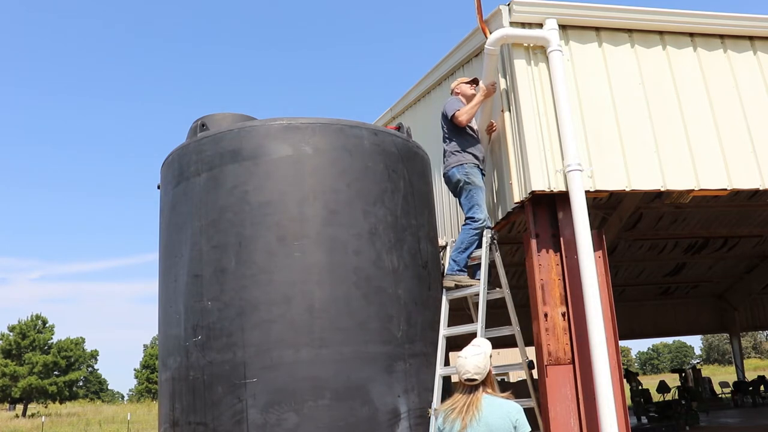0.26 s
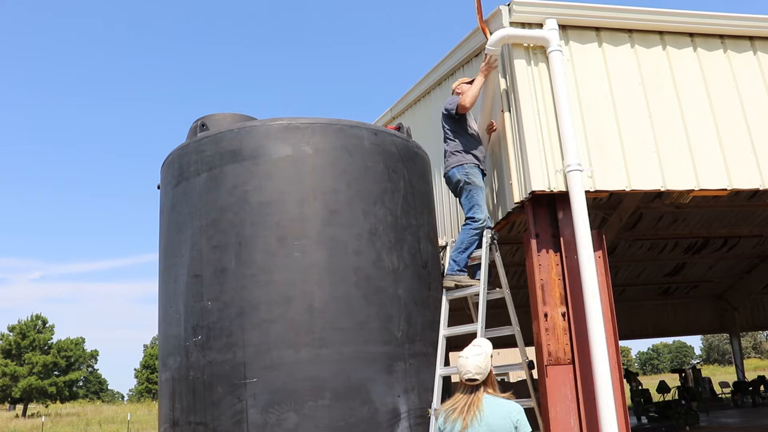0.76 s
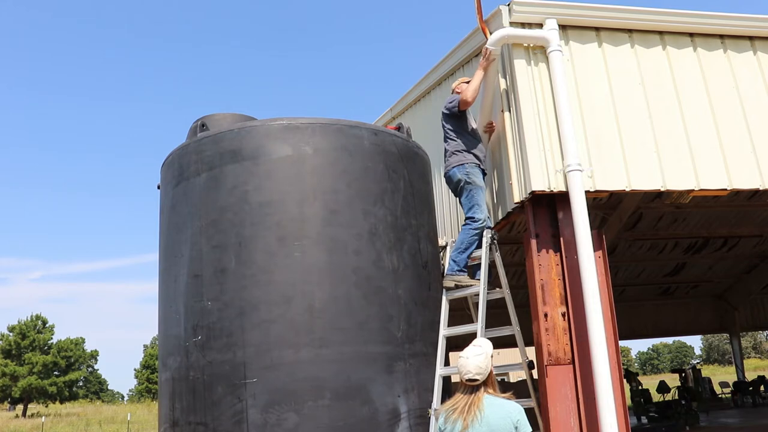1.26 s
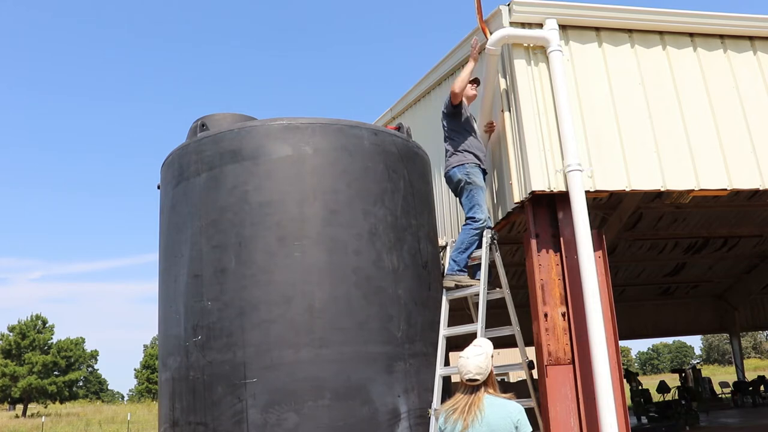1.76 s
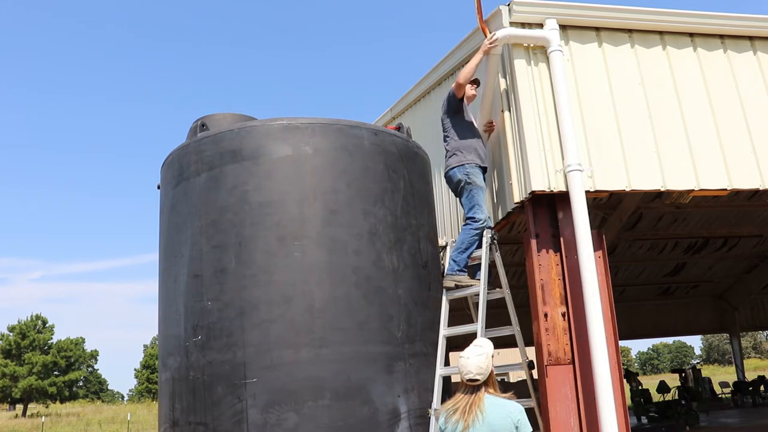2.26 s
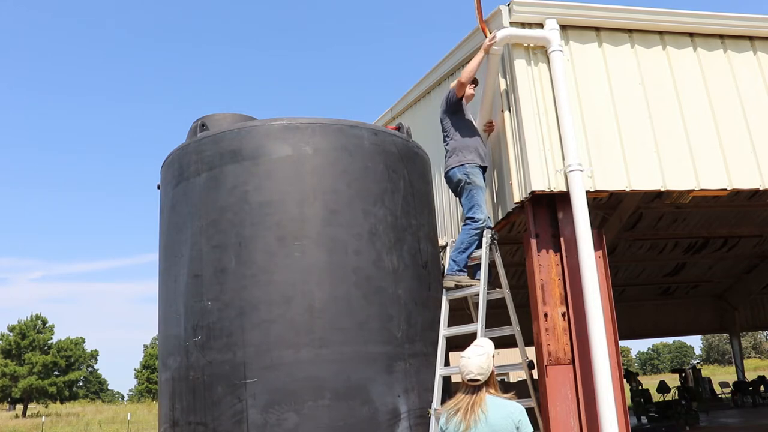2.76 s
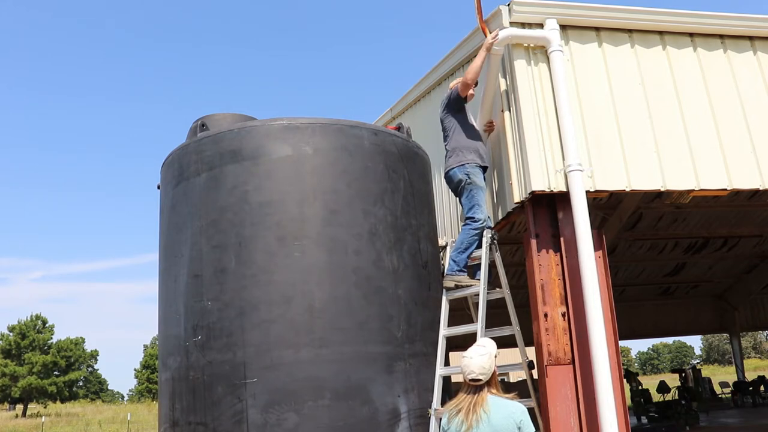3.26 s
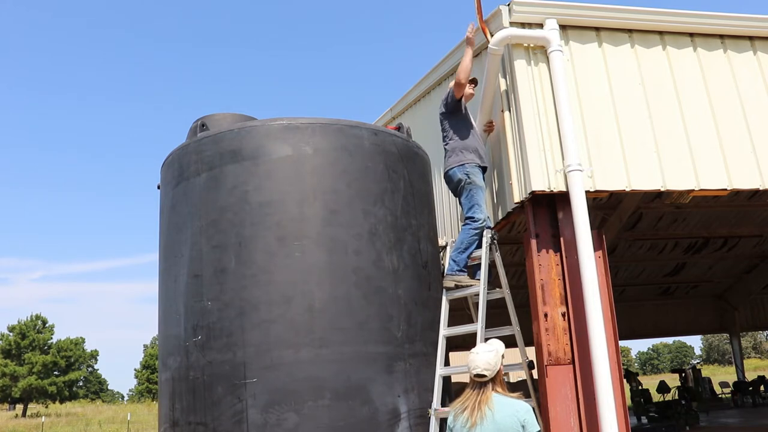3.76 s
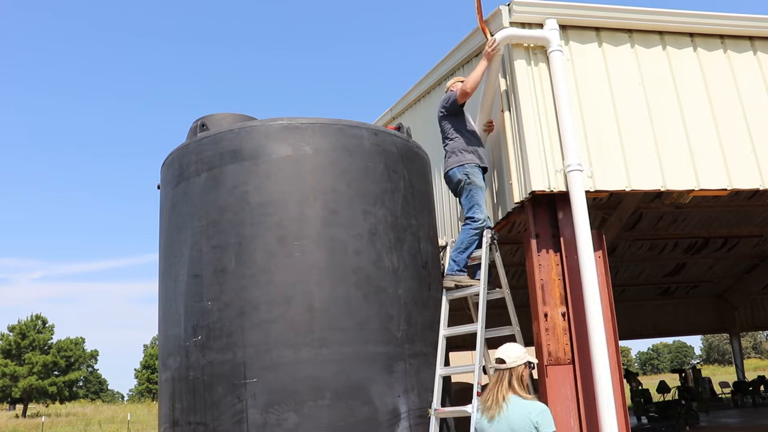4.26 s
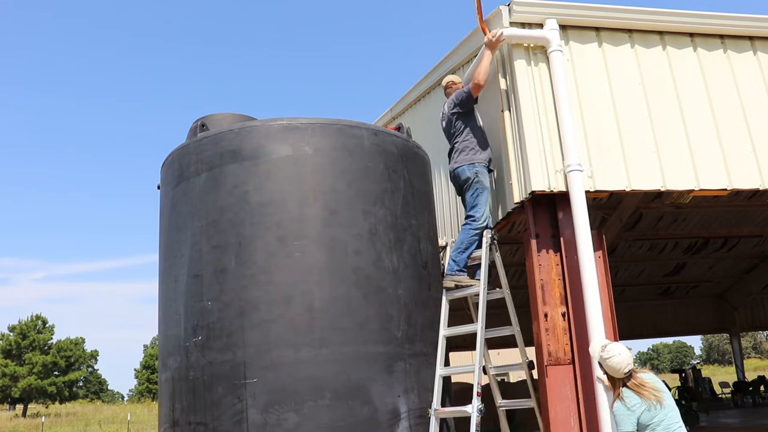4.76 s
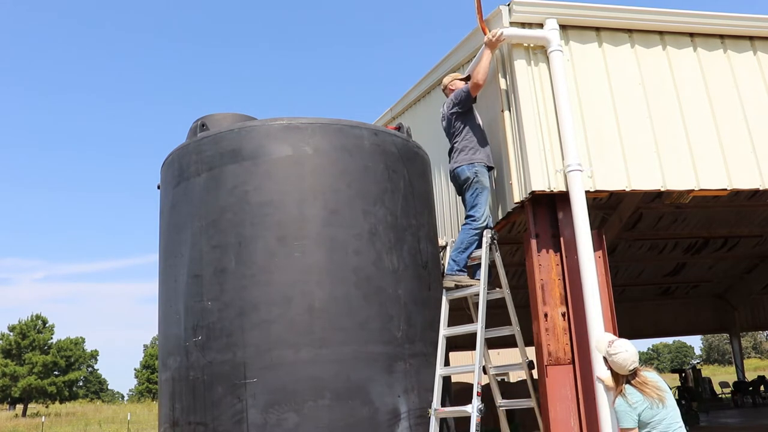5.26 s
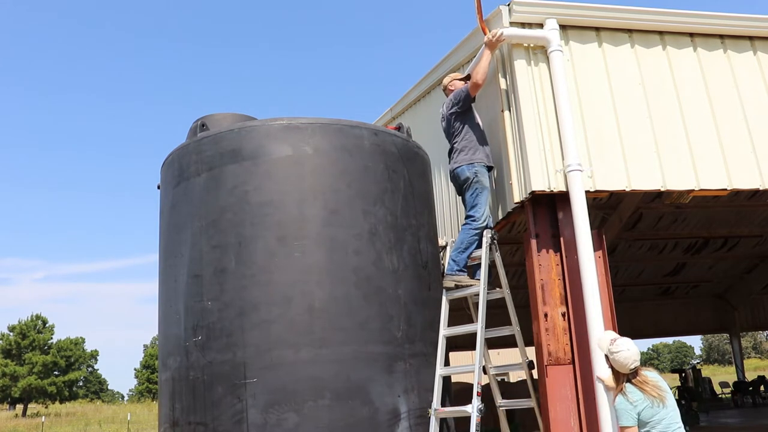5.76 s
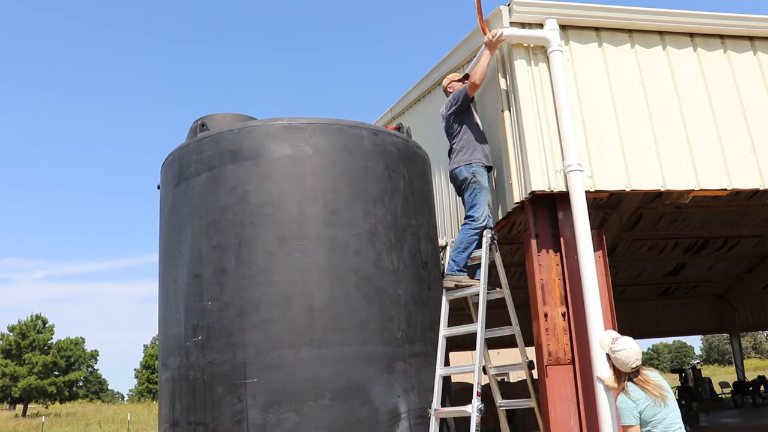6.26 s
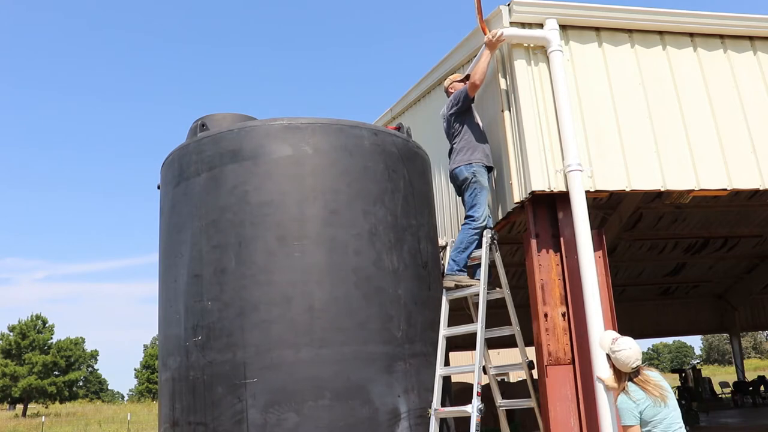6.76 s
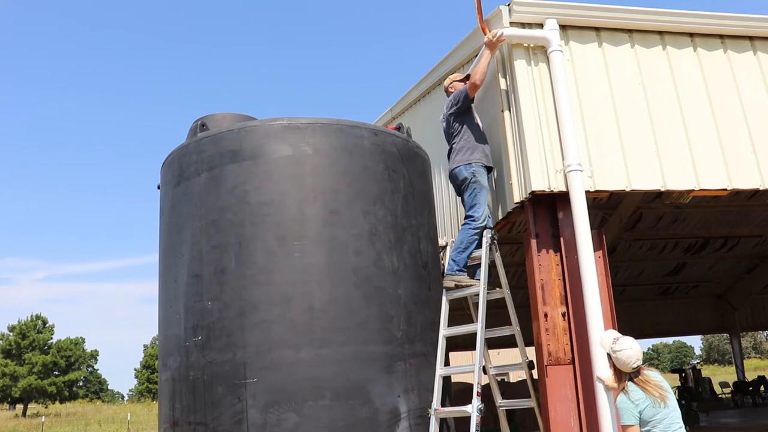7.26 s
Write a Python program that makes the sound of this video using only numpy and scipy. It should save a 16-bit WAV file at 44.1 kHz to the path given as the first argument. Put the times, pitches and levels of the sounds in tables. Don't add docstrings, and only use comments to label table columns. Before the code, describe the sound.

Outdoors, a plastic pipe is banged into its fitting with four sharp cracks, sheet-metal wall resonating, then only small taps and faint hiss.

```python
import sys
import numpy as np
from scipy import signal
from scipy.fft import rfft, irfft, next_fast_len
from scipy.io import wavfile
from scipy.ndimage import uniform_filter1d

SR = 44100
rng = np.random.default_rng(int(sys.argv[2]) if len(sys.argv) > 2 else 0)


def to_wav(s):
    ch = np.atleast_2d(s).T
    pcm = np.round(np.clip(ch, -1, 1) * 32767)
    wavfile.write(sys.argv[1], SR, pcm.astype(np.int16))


def rack_gain(trim_db):
    fader = np.asarray(trim_db, float)
    return 10 ** (fader / 20)


N = 331615
CUT_S = 4.712

# [f/Hz, width/Hz, level/dB]
PIPE_MODES = [(672, 44, 2.5), (1303, 83, -5), (2090, 120, -20.5), (4230, 133, 1), (4460, 300, -0.5),
              (5764, 150, -2.5), (6500, 500, -16), (8460, 1800, -8)]
# [t/s, knock level/dB, crack level/dB, contact/ms, share into the wall/dB]
BLOWS = [(2.013, -1.5, -6.5, 6.3, -15.5), (2.0202, -9, -13, 5.4, -13), (2.637, -5, -3, 9.2, -2.5),
         (2.6418, -14.5, -14, 8.5, -9.5), (2.6635, -13, -20.5, 1.5, -20), (3.2263, -20, -21.5, 7.2, -20.5),
         (3.2329, -3.5, -3, 11, -4.5), (3.2475, -17.5, -13.5, 3, -18.5), (3.9571, -6.5, 1, 5.3, -13.5),
         (3.9594, -0.5, 3, 5.7, -11.5), (3.9643, -11, -5.5, 3.9, -6)]
# [t/s, knock level/dB, hollow level/dB, crack level/dB, share into the wall/dB]
REBOUNDS = [(2.1297, -31.5, -37.5, -49, 2.5), (2.287, -41.5, -57.5, -56, -10.5),
            (2.7127, -29, -55, -31, -2), (3.2864, -22.5, -31.5, -28.5, -0.5), (3.296, -28, -18.5, -33, -5),
            (3.34, -17.5, -33, -30.5, 2), (3.396, -18.5, -16, -35, -11), (3.4192, -21, -25.5, -37, -5.5),
            (3.4451, -22.5, -39.5, -31, -5.5), (3.4934, -31, -49, -57, -22.5),
            (3.5701, -39.5, -46.5, -53, 4), (3.606, -32.5, -55.5, -41.5, -3.5),
            (4.0094, -23, -40.5, -36.5, 5), (4.0616, -14.5, -26.5, -24.5, 3.5),
            (4.1202, -13.5, -15.5, -23, -14.5), (4.1903, -27, -45, -44.5, -2),
            (4.338, -23.5, -30, -28.5, -8)]
# [t/s, knock level/dB, crack level/dB, share into the wall/dB]
TICKS = [(0.0106, -34, -58.5, 4), (0.0894, -36.5, -37.5, -6), (0.2962, -40.5, -57, 0.5),
         (0.3421, -37, -53, -5), (0.8939, -27, -31, -14), (1.44, -40, -41, -9), (1.3982, -34.5, -42, -2),
         (1.8965, -45, -53, -3), (5.8332, -42.5, -65, -14), (6.57, -41, -58, -10), (6.9043, -26, -47, -15)]
# [t/s, level/dB, centre f/Hz, contact/ms, share into the wall/dB]
TAPS = [(0.181, -30.5, 750, 6, -6.5), (0.894, -33.5, 600, 13, -16), (1.416, -36, 520, 8.4, -4.5),
        (1.447, -31, 420, 22, -8), (1.479, -39, 317, 5.5, -10), (2.045, -12.5, 790, 11, -12.5),
        (2.069, -17.5, 397, 11, -17.5), (2.663, -6, 590, 6.3, -16.5), (2.679, -24, 384, 7.8, -6.5),
        (3.157, -34, 555, 7.9, -5), (3.247, -2, 920, 14, -25), (3.409, -22, 700, 17, -14),
        (4.079, -16, 680, 28, -13), (4.134, -27, 265, 10, -10), (4.343, -18, 1190, 5.7, -36),
        (4.619, -49, 247, 8.4, -4.5), (4.713, -37, 477, 10, -2), (5.001, -21, 468, 15.6, -18.5),
        (5.018, -31, 643, 6.9, -25), (6.906, -17, 514, 13.7, -21)]
# [t/s, level/dB, f/Hz]
RINGS = [(0.090, -39.5, 2400), (0.182, -33.5, 750), (0.343, -49, 2890), (0.895, -43, 2870),
         (0.012, -45, 2800), (2.016, -6.5, 4600), (2.014, -7, 1910), (2.014, -10.5, 6500),
         (2.054, -16, 787), (2.638, -7.5, 3410), (2.638, -13, 8540), (2.6371, -9, 4640),
         (2.662, -16.5, 730), (2.716, -29, 3120), (3.232, -6, 5800), (3.234, -17, 1930),
         (3.340, -29.5, 4160), (3.448, -33, 2975), (3.609, -38, 2240), (3.959, -17, 720),
         (3.959, -2.5, 4300), (3.959, -9, 5600), (4.125, -18, 1190), (4.122, -29, 5300), (4.339, -20, 4920),
         (4.341, -22.5, 1424), (4.809, -49, 4500), (4.999, -30, 1204), (6.570, -42, 1000),
         (6.908, -28.5, 1146)]
# [t/s, level/dB, f/Hz]
HUMS = [
    (3.384, -26.5, 1000),
    (2.667, -21, 436),
    (3.256, -17.5, 420),
    (4.065, -22, 283),
    (4.07, -22, 1100),
    (4.722, -50, 1740),
]
# [f/Hz, level/dB, t60/s]
PANELS = [(151.4, -6, 0.4), (181.6, -1, 0.27), (250.6, -6, 0.5), (279, -6.5, 0.79), (407.4, -2.5, 0.31),
          (441, -1.5, 0.75), (468, -3, 0.47), (624, -1.5, 0.39), (657, -20, 0.85), (812, -6, 0.25),
          (980, -11, .35), (1098, -19, 0.22), (1260, -9.5, 0.19)]
# [f/Hz, level/dB, t60/s, build-up/ms]
SHED_WASH = [(152.3, -3.5, 1, 13), (272.3, -0.5, 0.75, 20), (506, -3.5, 0.62, 11), (1000, -5.5, 0.44, 15.2),
             (2065, -15.5, 0.4, 24), (3200, -8.5, 0.38, 10), (5370, -13.5, 0.33, 7.1),
             (10900, -25, 0.19, 4)]
# [t/s, frame level/dB, rumble level/dB, grit level/dB]
SHAKES = [
    (2.012, -49, -42, -46),
    (2.638, -45.5, -52.5, -61),
    (3.234, -40, -44.5, -45.5),
    (3.96, -39, -36.5, -42.5),
]
# [t/s, f/Hz, level/dB, t60/s]
PANEL_FLEX = (0.006, 178, -21, .2)
# [t/s, level/dB]
WIND_LEVELS = [(0.0, -54), (0.12, -50), (0.2, -50.5), (0.55, -41), (0.76, -44), (0.9, -68), (1.44, -49.5),
               (1.93, -69), (2.05, -54.5), (3.1, -69), (3.271, -59), (4.63, -60.5), (4.75, -55),
               (5.401, -51.5), (5.95, -61), (6.18, -51), (7.0, -59), (7.3, -70)]
# [peak t/s, level/dB, rise/s, fall/s]
SWELLS = [
    (.74, -55, .13, .14),
    (1.15, -61, 0.057, 0.088),
    (4.52, -49, 0.14, 0.28),
    (6.18, -57, .2, 0.16),
    (6.37, -61, 0.027, 0.055),
    (4.7, -53, .02, .02),
    (6.528, -64.5, 0.057, .05),
]
# [f/Hz, width/Hz, level/dB]
RUSTLE_MODES = [(1500, 1500, -2), (4300, 2400, 1.5), (8750, 1840, -0.5), (13420, 2600, -12)]
# [f/Hz, level/dB per Hz]
HISS_COLOUR = [(59, -36.5), (100, -3), (163, 4), (283, -18.5), (1200, -18), (1650, -15), (4570, -19),
               (16000, -23.5)]


def pipe():
    direct, push = np.zeros((2, N + SR))
    for s, wall_db, contact_ms, rise_ms, parts in knocks() + taps():
        sound = contact(contact_ms, parts, rise_ms)
        shift = 1 + 0.05 * rng.standard_normal()
        start = int(s * SR)
        at = slice(start, start + len(sound))
        direct[at] += shaped(sound, lambda f: 0.83 + 0.47 * resonances(f * shift, PIPE_MODES))
        slow_part = (parts[0][0] - 10, 120, 400, 1)
        kick = shove(parts + [slow_part])
        push[start:start + len(kick)] += rack_gain(wall_db + 7.5) * kick
    tones = [(s, db, hz, 3 - 0.31 * db) for s, db, hz in RINGS]
    tones += [(s, db, hz, 72) for s, db, hz in HUMS]
    for s, db, hz, contact_ms in tones:
        sound = contact(contact_ms, [(db, hz / 1.206, hz * 1.171, 1)], rise_ms=0.1)
        start = int(s * SR)
        direct[start:start + len(sound)] += sound
    return direct[:N], push[:N]


def knocks():
    hits = [(s, db, db - 11.5, crack_db, contact_ms, 0.1, wall_db)
            for s, db, crack_db, contact_ms, wall_db in BLOWS]
    hits += [(s, db, hollow_db, crack_db, 8.9, 2.7, wall_db)
             for s, db, hollow_db, crack_db, wall_db in REBOUNDS]
    hits += [(s, db, db - 6.5, crack_db, 10.5, 0.1, wall_db)
             for s, db, crack_db, wall_db in TICKS]
    contacts = []
    for s, knock_db, hollow_db, crack_db, contact_ms, rise_ms, wall_db in hits:
        # (peak dB, low Hz, high Hz, stretch of the contact)
        parts = [(hollow_db, 400, 900, 1.4),
                 (knock_db, 900, 2200, 1.0),
                 (crack_db - 2.0, 3500, 8000, 0.8),
                 (crack_db - 10.0, 8000, 14500, 0.22),
                 (knock_db - 21.5, 2200, 3500, 0.8),
                 (hollow_db - 17, 110, 350, 2.5)]
        contacts.append((s, wall_db, contact_ms, rise_ms, parts))
    return contacts


def taps():
    contacts = []
    for s, db, hz, contact_ms, wall_db in TAPS:
        parts = [(db, hz / 1.86, hz * 1.81, 1.2),
                 (db - 9.0, hz * 1.4, hz * 3.5, 0.6),
                 (db - 23, 3000, 9000, 0.6)]
        contacts.append((s, wall_db, contact_ms, 0.94, parts))
    return contacts


def contact(contact_ms, parts, rise_ms, size=8192):
    t = np.arange(size) / SR
    noise = rng.standard_normal(size)
    grain = rng.exponential(size=size // 16)
    chatter = noise * np.repeat(rack_gain(3.45 * grain), 16) * (1 - np.exp(-t * 1000 / rise_ms))
    out = np.zeros(size)
    for db, lo_hz, hi_hz, stretch in parts:
        hold_ms = max(contact_ms, 0.5) * stretch
        burst = band(chatter * np.exp(-(t * 1000 / hold_ms) ** 1.18), lo_hz, hi_hz)
        out += rack_gain(db + 1.5) * burst / np.abs(burst).max()
    return out


def shove(parts, size=2048):
    out = np.zeros(size)
    for db, lo_hz, hi_hz, _ in parts:
        kick = band(signal.unit_impulse(size), lo_hz, hi_hz, order=2)
        out += rack_gain(db) * kick / np.abs(kick).max()
    return out


def wall(push):
    t = np.arange(int(1.5 * SR)) / SR
    rings, wash = np.zeros((2, len(t)))
    for hz, db, t60 in PANELS:
        rings += rack_gain(db) * np.sin(2 * np.pi * (hz * t + rng.random())) * decay(t, t60)
    for hz, db, t60, rise_ms in SHED_WASH:
        noise = unit(shaped(rng.standard_normal(len(t)), lambda f: bump(f, hz, 0.48)))
        build_up = 1 - np.exp(-t * 1000 / rise_ms)
        wash += rack_gain(db) * noise * np.sqrt(hz / 1000) * decay(t, t60) * build_up
    rings *= rack_gain(-16.5) * (1 - np.exp(-t / 0.0017))
    wash *= rack_gain(-11.5 + 1.5 * walk(83)[:len(t)])
    answer = (rings + wash) / np.sqrt(SR / 100)
    first = np.arange(N) < CUT_S * SR
    before = signal.fftconvolve(push * first, answer)[:N]
    after = signal.fftconvolve(push * ~first, answer)[:N]
    return before * first + after


def thump():
    s, hz, db, t60 = PANEL_FLEX
    age = np.maximum(np.arange(N) / SR - s, 0)
    return rack_gain(db) * np.sin(2 * np.pi * hz * age) * (1 - np.exp(-age / 0.015)) * decay(age, t60)


def frame():
    frame_hz, beat_s, lag_s, hold_s, rise_s = 75, 0.28, 0.07, 0.6, 0.06
    t, out = np.arange(N) / SR, np.zeros(N)
    for s, db, _, _ in SHAKES:
        age = t[t >= s] - s
        throb = np.cos(np.pi * (age - lag_s) / beat_s) * (1 - np.exp(-age / rise_s))
        hold = np.exp(-(age / hold_s) ** 3)
        out[t >= s] = rack_gain(db + 2) * hold * throb * np.sin(2 * np.pi * frame_hz * age)
    return out * (t < CUT_S)


def grit():
    sizzle = unit(shaped(rng.standard_normal(N), lambda f: bump(f, 5000, 0.44)))
    return sizzle * sum(swell(s, db, 0.0027, 0.14) for s, _, _, db in SHAKES)


def rustle():
    grains = rng.standard_normal(N) * rack_gain(2.0 * walk(150))
    level = rack_gain(-68.5) + sum(swell(*row) for row in SWELLS)
    return level * unit(shaped(grains, lambda f: resonances(f, RUSTLE_MODES)))


def wind():
    buffets = shaped(rng.standard_normal(N), lambda f: bump(f, 38, 1.0)) * rack_gain(5.5 * walk(14))
    s, db = np.transpose(WIND_LEVELS)
    gust = rack_gain(np.interp(np.arange(N) / SR, s, db) + 3.5 + 1.1 * walk(4))
    return gust * unit(buffets)


def hush():
    murmur = shaped(rng.standard_normal(N), lambda f: bump(f, 350, 1.365)) * rack_gain(2.6 * walk(12))
    field = rack_gain(-57.5 + 0.5 * walk(3))
    rumble = sum(swell(s, db, 0.003, 0.31) for s, _, db, _ in SHAKES)
    return (field + rumble) * unit(murmur)


def hiss():
    hz, db = np.transpose(HISS_COLOUR)
    noise = shaped(rng.standard_normal(N), lambda f: rack_gain(np.interp(np.log(f), np.log(hz), db)))
    return rack_gain(-56.5) * unit(noise)


def swell(s, db, rise_s, fall_s):
    t = np.arange(N) / SR
    same_scene = (t < CUT_S) == (s < CUT_S)
    return rack_gain(db) * np.exp(-((t - s) / np.where(t < s, rise_s, fall_s)) ** 2) * same_scene


def decay(t, t60):
    return np.exp(-np.log(1000) * t / t60)


def unit(x):
    return x / np.sqrt(np.mean(x ** 2) + 1e-20)


def shaped(x, gain):
    n = next_fast_len(len(x))
    f = np.arange(n // 2 + 1) * SR / n + 1
    return irfft(rfft(x, n) * gain(f), n)[:len(x)]


def bump(f, hz, octaves):
    return np.exp(-0.5 * (np.log2(f / hz) / octaves) ** 2)


def resonances(f, modes):
    total = 0
    for k, (hz, width, db) in enumerate(modes):
        total = total + (-1) ** k * rack_gain(db) * 1j * f * width / (hz ** 2 - f ** 2 + 1j * f * width)
    return total


def walk(rate):
    k = int(SR / rate)
    held = np.repeat(rng.standard_normal(N // k + 1), k)
    return 1.01 * uniform_filter1d(uniform_filter1d(held, k), k)[:N]


def band(x, lo_hz, hi_hz, order=3):
    return signal.sosfilt(signal.butter(order, [lo_hz, hi_hz], "band", fs=SR, output="sos"), x)


def scene():
    direct, push = pipe()
    shed = wall(push) + thump() + frame() + grit()
    surroundings = rustle() + wind() + hush() + hiss()
    return (direct + shed + surroundings)[None]


def band_limit(x):
    return signal.sosfilt(signal.butter(12, 16330, fs=SR, output="sos"), x)


def record(dry):
    rounded = 1.25 * np.tanh(dry / 1.25)
    top_cut = signal.ellip(8, 0.2, 60, 16100, fs=SR, output="sos")
    return band_limit(signal.sosfilt(top_cut, rounded))


dry = scene()
out = record(dry)
to_wav(out)
```